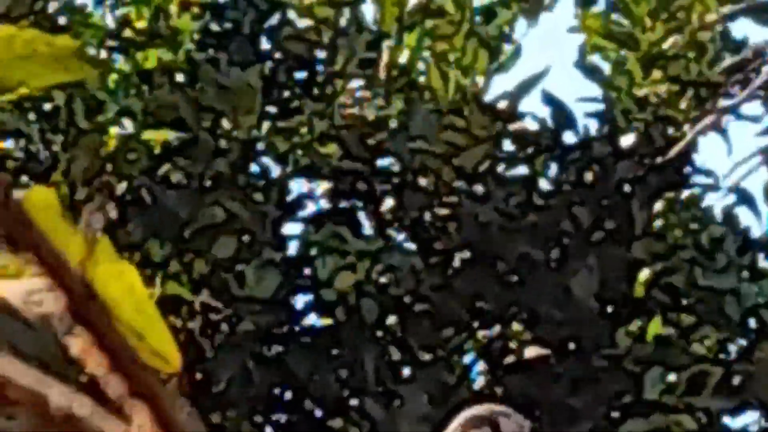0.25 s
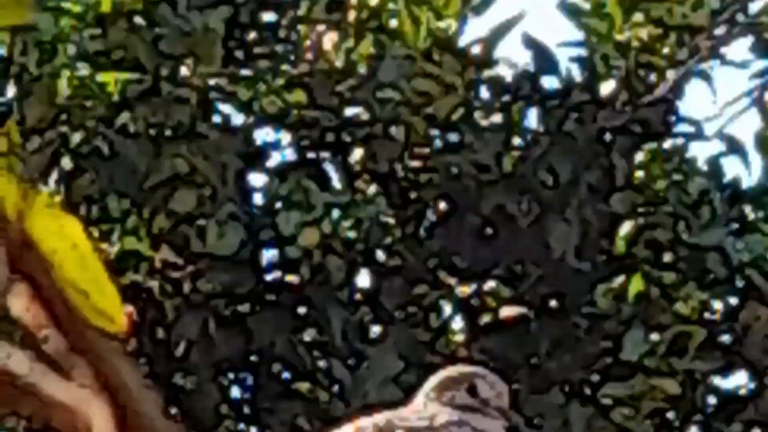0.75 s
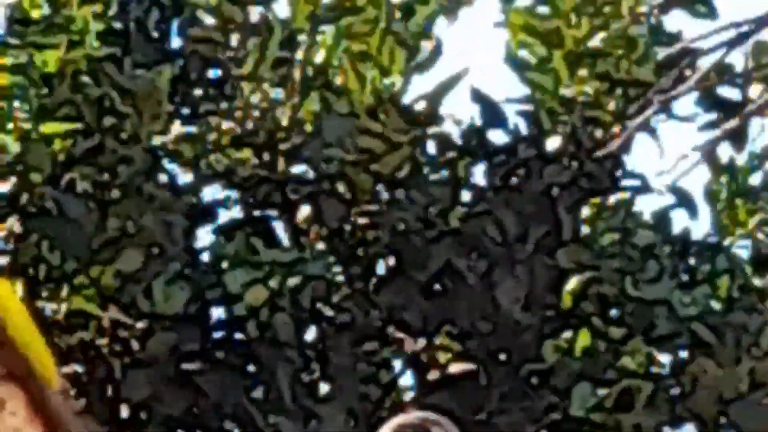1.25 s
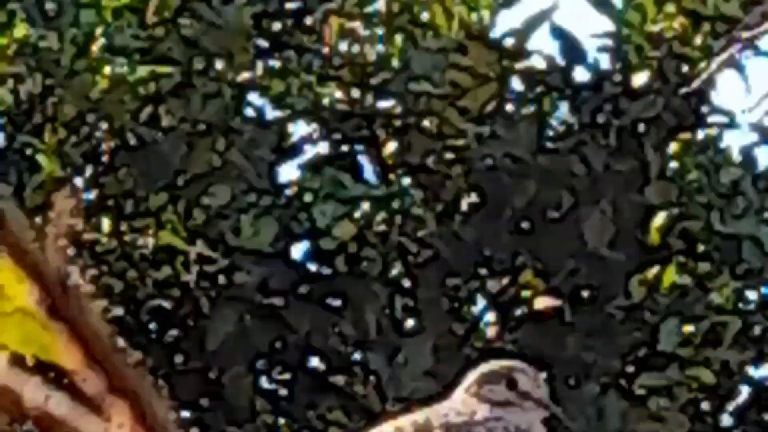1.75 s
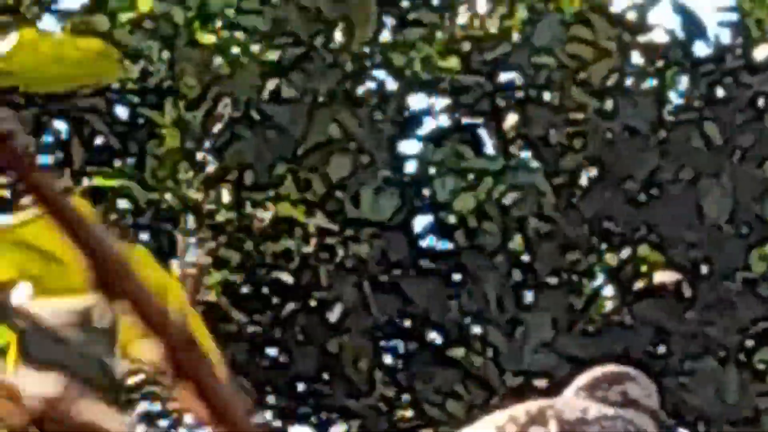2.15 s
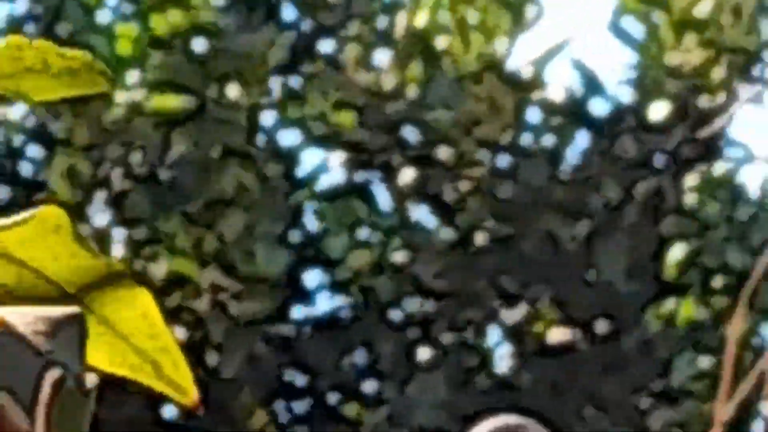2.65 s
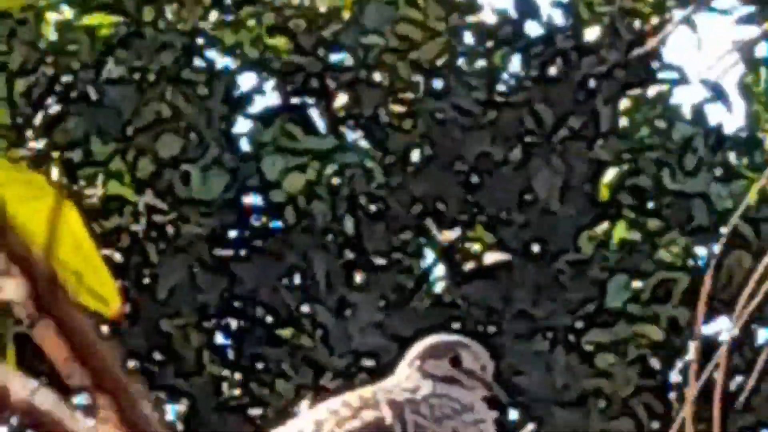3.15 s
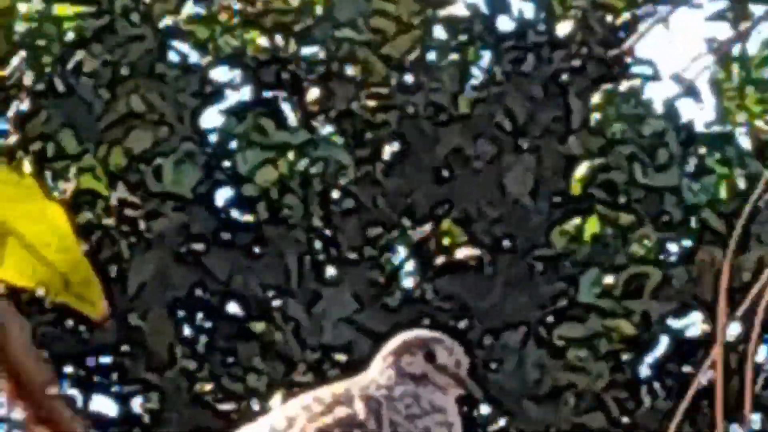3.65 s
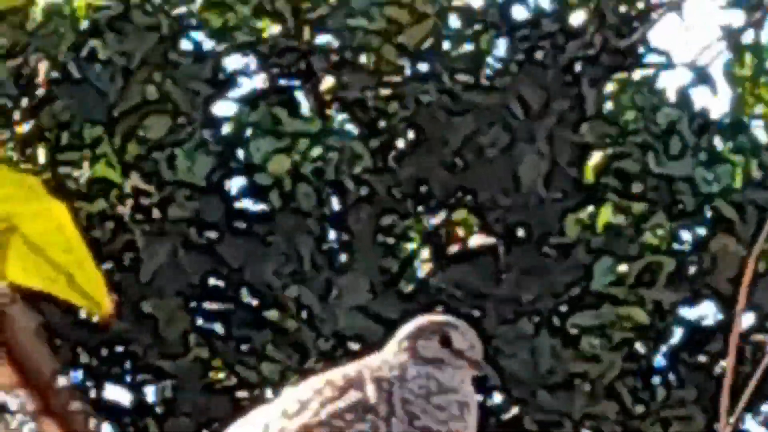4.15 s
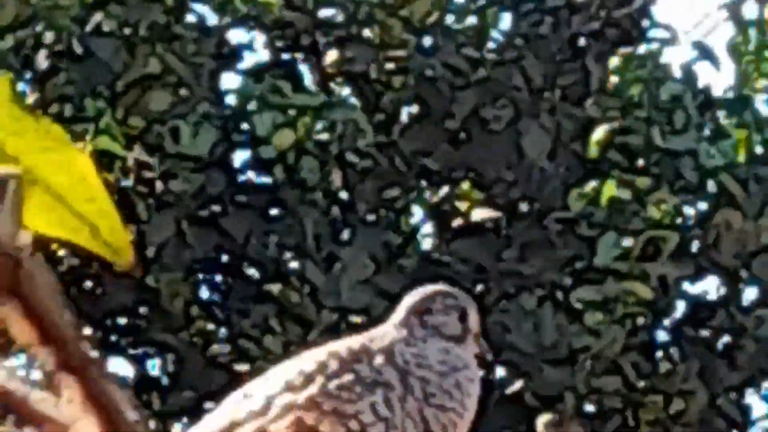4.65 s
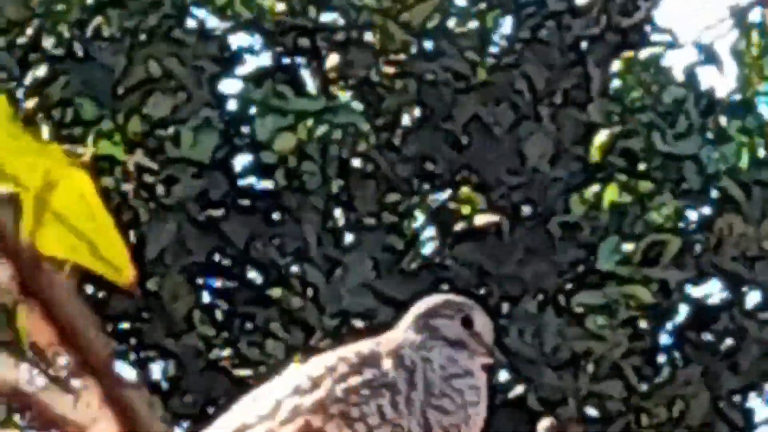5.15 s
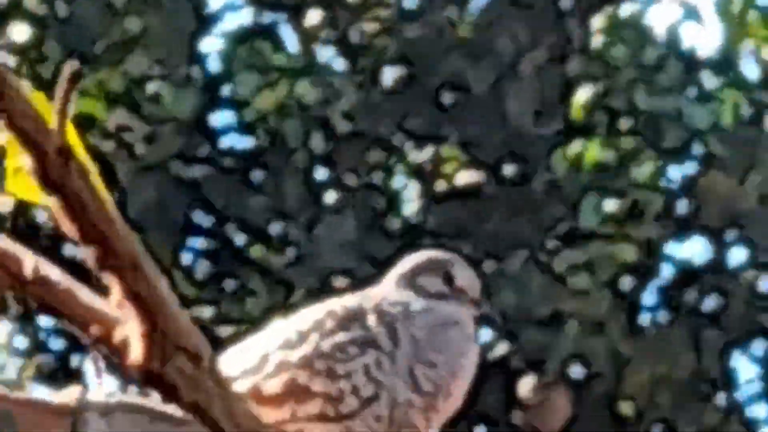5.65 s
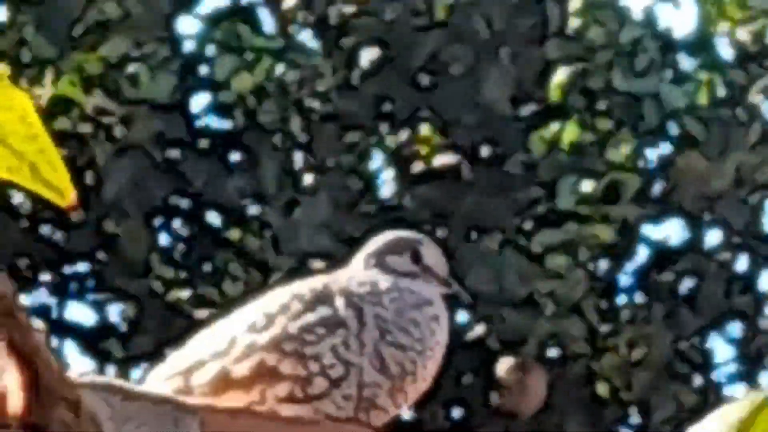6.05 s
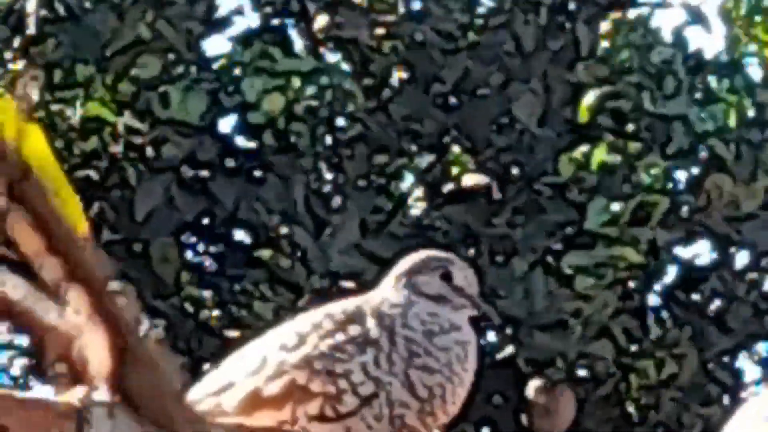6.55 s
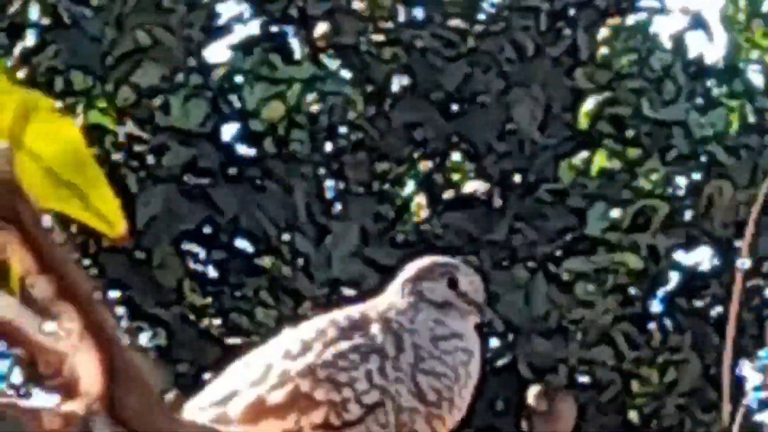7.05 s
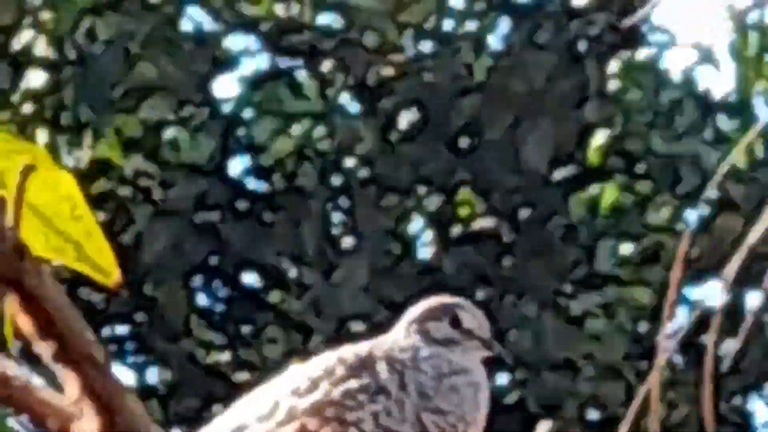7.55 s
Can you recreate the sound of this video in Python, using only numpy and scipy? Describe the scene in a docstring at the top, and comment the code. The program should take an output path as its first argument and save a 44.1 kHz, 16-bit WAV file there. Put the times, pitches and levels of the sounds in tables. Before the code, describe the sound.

A small dove repeats a quick three-note coo outdoors, over a distant engine's rising and falling rumble and faint leaf hiss.

```python
"""A small dove on a branch repeats "coo, cut-coo": three near-pure whistles that arch and fall in pitch.
Echoes from nearby surfaces beat against the glides and trail off in the trees.
Further off, a heavy six-cylinder engine revs up and down over road rumble, with a few brief hums.
Leaves hiss and tick."""
import sys
import numpy as np
from scipy import signal
from scipy.fft import rfft, irfft
from scipy.io import wavfile
from scipy.ndimage import uniform_filter1d

SR = 44100
rng = np.random.default_rng(int(sys.argv[2]) if len(sys.argv) > 2 else 0)


def store_wav(level_fs):
    """Save 16-bit WAV to argv[1]."""
    pcm = np.round(np.clip(np.atleast_2d(level_fs), -1, 1) * 32767)
    wavfile.write(sys.argv[1], SR, pcm.T.astype(np.int16))


N = 343539
TIME_S = np.arange(N) / SR
FREQ_HZ = np.fft.rfftfreq(N, 1 / SR) + 1e-6

# dove notes: t/s, length factor, pitch factor, level/dB, added rise/Hz
FIRST_COO_NOTES = [(1.334, 1.03, 1.002, -32.9, 10), (3.807, 0.94, 1.001, -32.4, -13),
                   (5.472, 1.01, 1.005, -32.1, 1), (7.159, 1.04, 1.004, -31.8, -2)]
CUT_NOTES = [(-0.015, 0.97, 0.998, -29.4, -1), (1.716, 1.0, 1.001, -31.4, 0),
             (4.187, 0.97, 1.003, -29.4, 0), (5.851, 0.98, 1.014, -31.3, -12),
             (7.539, 1.0, 1.01, -29.5, -8)]
LAST_COO_NOTES = [(0.1, 0.95, 1.001, -31.5, 12), (1.828, 0.95, 1.004, -32.5, 6),
                  (4.3, 0.96, 1.013, -30.4, -13), (5.963, 1.01, 1.015, -30.8, -9),
                  (7.65, 1.01, 1.006, -30.4, 5)]
# note contours: t/s from onset, f/Hz, relative level/dB
FIRST_COO_CONTOUR = [(0.0, 561.3, -16), (0.012, 780.5, -5), (0.035, 903.4, -1.4), (0.055, 891.6, -2),
                     (0.085, 859, -5.5), (0.121, 785.5, 1.4), (0.16, 727, -4.5), (0.195, 685.2, -10.5),
                     (0.217, 616, -7)]
CUT_CONTOUR = [(0.0, 613, -9.1), (0.01, 902, -2.3), (0.022, 968, -3.5), (0.04, 916, 0.6),
               (0.054, 770, -7.3), (0.068, 557, -16.4)]
LAST_COO_CONTOUR = [(0.0, 657, -3.5), (0.013, 895, -3), (0.035, 929, 1.5), (0.07, 912, 2), (0.12, 877, -3),
                    (0.162, 815, -2), (0.194, 786, -3), (0.22, 729, -11.5), (0.237, 644, -11)]
# ground, trunk and wall echoes: delay/ms, level/dB, right-ear lag/ms
REFLECTIONS = [(4.41, -9.9, -0.39), (9.97, -10.4, -0.13), (12.69, -8.7, -0.07), (16.28, -13.7, 0.01),
               (16.94, -11.6, -0.65), (17.97, -11.4, 0.03), (21.33, -16.0, 0.04), (25.24, -15.0, -0.02),
               (29.04, -15.0, -0.03), (34.74, -11.7, -0.05), (39.62, -12.5, -0.15), (45.35, -19.1, -0.19),
               (45.75, -16.1, -0.03), (54.01, -19.2, -0.23), (58.85, -15.6, -0.19), (59.28, -17.9, -0.13),
               (67.53, -10.7, -0.05), (68.06, -9.7, -0.05)]

# engine firing rate: t/s, f/Hz
FIRING_RATE = [(0, 83.2), (.37, 71.2), (.7, 77), (1.06, 70.9), (1.6, 67.23), (2.2, 54.4), (2.58, 54.4),
               (2.88, 81.87), (3.19, 89.2), (3.47, 92.5), (3.8, 90.76), (4.06, 84.2), (4.45, 90.37),
               (4.81, 88.4), (5.23, 82.56), (6.12, 65.83), (6.31, 81.66), (6.51, 91.7), (6.75, 82.93),
               (6.98, 80.36), (7.24, 93.1), (7.46, 98.2), (7.79, 96.2)]
# firing tone and second harmonic, before expansion: t/s, level/dB
FIRING_LEVEL = [(0.0, -32.5), (0.15, -31.5), (0.22, -49.5), (0.8, -46.5), (1.36, -62), (1.74, -43),
                (2.08, -50), (2.41, -41.5), (2.62, -47), (2.69, -32.5), (3.1, -36), (3.23, -29),
                (3.75, -34.5), (3.8, -31.5), (3.86, -48.5), (4.23, -32.5), (4.25, -37.5), (4.47, -27.5),
                (4.81, -29.5), (4.88, -40.5), (4.92, -36), (4.99, -41), (5.53, -40.5), (5.55, -46),
                (5.71, -34.5), (5.81, -57), (5.9, -35.5), (6.14, -33), (6.2, -47.5), (6.55, -29),
                (6.62, -32), (6.7, -50), (6.77, -36.5), (6.81, -56), (6.94, -38), (6.99, -53), (7.2, -41),
                (7.24, -31.5), (7.31, -28.5), (7.79, -25.5)]
SECOND_LEVEL = [(0.0, -56), (0.28, -50), (0.3, -78), (2.62, -55.5), (2.8, -46.5), (3.12, -33.5),
                (3.27, -46), (3.3, -43.5), (3.95, -52.5), (4.32, -41), (4.99, -37), (5.12, -54),
                (5.19, -41.5), (5.84, -51), (5.97, -40.5), (6.31, -47.5), (6.49, -37), (6.96, -52.5),
                (7.46, -39.5), (7.79, -37.5)]
# low lines from unequal cylinders, then overtones: multiple of cycle rate, relative level/dB
LOPE_LINES = [(2, -33), (4, -21), (5, -15), (7, -18.5), (8, -37), (9, -27.5)]
OVERTONE_LINES = [(14, -3), (15, -11), (16, -14.5), (18, -8.5), (21, -14), (24, -10), (28, -14),
                  (30, -20.5), (36, -19.5), (42, -14)]
# exhaust resonances: f/Hz, gain/dB
EXHAUST_RESPONSE = [(150, -13), (210, -8), (238, 6.5), (275, -4.5), (296, 4.5), (312, 8.5), (332, -9.5),
                    (400, -21), (428, 9), (455, -4), (700, -22)]
# hums in the engine noise: t/s, length/s, f/Hz, level/dB
HUM_EVENTS = [(2.077, 0.64, 96.6, -44.5), (2.603, 0.27, 315.4, -52.5), (5.377, 0.285, 235.8, -48),
              (6.78, .25, 313, -44.5)]

# road roar, low and high leaf hiss; only the swing about the mean counts: t/s, level/dB
ROAD_LEVEL = [(0.0, -52.5), (0.45, -62), (0.76, -57.5), (1.3, -65), (1.43, -60), (2.56, -64), (2.6, -66.5),
              (2.75, -51.5), (3.01, -56), (3.43, -57), (5.88, -57.5), (6.68, -56), (6.72, -57.5),
              (7.57, -52.5), (7.72, -54.5), (7.79, -51)]
LEAF_LOW_LEVEL = [(0.0, -60), (0.39, -63), (1.28, -64), (1.84, -60.5), (2.4, -63), (3.32, -59), (3.92, -61),
                  (4.37, -58.5), (4.8, -59.5), (4.97, -61), (6.86, -62), (7.7, -59.5)]
LEAF_HIGH_LEVEL = [(0.0, -70.5), (0.15, -64), (0.37, -69.5), (1.28, -69.5), (1.8, -65), (2.19, -68),
                   (2.84, -63.5), (3.14, -63), (3.3, -62), (3.6, -61.5), (3.93, -64), (4.56, -61),
                   (5.16, -65), (5.62, -64), (6.72, -66.5), (7.79, -66)]
# noise spectra: f/Hz, relative density/dB
ROAD_SPECTRUM = [(20, -49), (40, 2), (60, 6), (100, 10.5), (160, 4), (250, -4.5), (320, 0), (420, -6.5),
                 (600, -5.5), (800, -9.5), (1100, -18.5), (1600, -26)]
AIR_SPECTRUM = [(700, -6.5), (1200, 6.5), (1600, -2.5), (2100, -1), (2800, -15), (4000, -18.5)]
LEAF_LOW_SPECTRUM = [(1800, -2.5), (2600, 0.5), (3600, 1.5), (4150, 3), (4600, 1.5), (6000, -2), (7300, -2),
                     (7900, -11.5), (9000, -23)]
LEAF_HIGH_SPECTRUM = [(7000, -15), (8200, -14), (9300, -6.5), (11000, -3.5), (12400, -2), (14000, -2.5),
                      (15800, -6.5)]
# noise balance: f/Hz, left minus right/dB
NOISE_BALANCE = [(60, -5.5), (160, -0.5), (300, -2), (1000, 0), (2300, -2.5), (4400, -2.5), (6500, -9.5),
                 (9000, 2.5), (13000, 1)]
# leaves and twigs brushing: t/s, level/dB, length/s, centre/Hz, width/Hz
RUSTLE_EVENTS = [(.29, -65, .04, 8700, 700), (.962, -65, .025, 11000, 6000), (1.456, -63, .012, 9000, 7000),
                 (1.597, -55.5, .012, 10000, 10000), (1.652, -56, .01, 9000, 10000),
                 (2.655, -59, .015, 13000, 4000), (5.685, -59, .02, 13000, 3000),
                 (6.932, -53, .025, 4800, 4000), (7.29, -56, .01, 5500, 2000),
                 (7.726, -51, .03, 3800, 5000), (7.76, -53, .04, 3800, 5000)]


def undb(db):
    """dB to gain."""
    return 10 ** (np.asarray(db) / 20)


def unit(x):
    """Scale to rms 1."""
    return x / np.sqrt(np.mean(x ** 2))


def pan(db):
    """Stereo gains, left db above right."""
    return undb(np.array([[db], [-db]]) / 2)


def curve(table):
    """Time table, interpolated per sample."""
    return np.interp(TIME_S, *np.transpose(table))


def swing_db(table):
    """Level curve minus its mean."""
    db = curve(table)
    return db - db.mean()


def spectrum_gain(spectrum):
    """Gain per FFT bin, interpolated over log frequency."""
    hz, db = np.transpose(spectrum)
    return undb(np.interp(np.log(FREQ_HZ), np.log(hz), db))


def drift(rate_hz):
    """Smooth random drift, spread near 1."""
    hold = int(SR / rate_hz)
    steps = rng.standard_normal(N // 40)[np.arange(N) // max(hold, 40)]
    return 1.3 * uniform_filter1d(uniform_filter1d(steps, hold), hold)


def noise(spectrum, coherent_hz=900):
    """Coloured stereo noise, rms 1; ears alike in the bass, unrelated in the treble."""
    mid, side = rfft(rng.standard_normal((2, N)))
    coherence = .75 / (1 + (FREQ_HZ / coherent_hz) ** 4)
    ears = mid * np.sqrt(1 + coherence) + np.array([[1], [-1]]) * side * np.sqrt(1 - coherence)
    rolloff = 1 / (1 + (FREQ_HZ / (2 * spectrum[-1][0])) ** 4)
    balance = spectrum_gain(NOISE_BALANCE) ** np.array([[.5], [-.5]])
    return unit(irfft(ears * spectrum_gain(spectrum) * rolloff * balance, N))


def coos(notes, contour, edge_s=0.0032, waver=0.007):
    """One note type: a sine on an arched contour, stretched and retuned per note."""
    knots_s, hz, db = np.transpose(contour)
    end_s = knots_s[-1]
    tremor = 1 + waver * drift(120)
    out = np.zeros(N)
    for start_s, stretch, pitch, note_db, rise_hz in notes:
        contour_s = (TIME_S - start_s) / stretch
        on = (contour_s > 0) & (contour_s < end_s)
        contour_s = contour_s[on]
        note_hz = np.interp(contour_s, knots_s, hz) * pitch + rise_hz * contour_s / end_s
        phase = 2 * np.pi * np.cumsum(note_hz * tremor[on]) / SR
        gate = np.minimum(np.minimum(contour_s, end_s - contour_s) / edge_s, 1)
        out[on] += gate * undb(note_db + np.interp(contour_s, knots_s, db)) * np.sin(phase)
    return out


def dove():
    """Closed beak and swollen throat pass only the fundamental."""
    return (coos(FIRST_COO_NOTES, FIRST_COO_CONTOUR) + coos(CUT_NOTES, CUT_CONTOUR)
            + coos(LAST_COO_NOTES, LAST_COO_CONTOUR))


def echoes(source, tail_db=-12.0, t60_s=0.5, build_s=0.13):
    """Direct sound, discrete reflections and a diffuse tail building among the trees."""
    t = TIME_S[:SR]
    tail = rng.standard_normal((2, SR)) * undb(-60 * t / t60_s) * np.minimum(t / build_s, 1) ** 3
    response = undb(tail_db) * unit(tail) / np.sqrt(SR)
    response[:, 0] += 1
    for delay_ms, db, lag_ms in REFLECTIONS:
        for ear, side in enumerate((-.5, .5)):
            response[ear, round((delay_ms + side * lag_ms) * 1e-3 * SR)] += undb(db)
    return signal.fftconvolve(source[None], response, axes=1)[:, :N]


def partial(crank_locked_phase, db, flutter_db=4.5, scatter=0.24):
    """One fluttering engine line; shifting paths through the trees pull the ears apart."""
    phase = crank_locked_phase + rng.uniform(0, 2 * np.pi)
    side = scatter * drift(11) * np.cos(phase)
    amplitude = np.sqrt(2) * undb(db + flutter_db * drift(18))
    return amplitude * (np.sin(phase) + np.array([side, -side]))


def engine(cylinders=6, wander=0.0032, expand=0.16, overtone_base_db=-55, overtone_follow=0.28):
    """Distant exhaust: strong firing tone, weaker lines at multiples of the cycle rate."""
    firing_hz = curve(FIRING_RATE)
    phase = 2 * np.pi * np.cumsum(firing_hz * (1 + wander * drift(25.08))) / SR
    # expansion sinks the tones into the rumble as the engine eases off
    firing_db = curve(FIRING_LEVEL) + expand * swing_db(FIRING_LEVEL)
    second_db = curve(SECOND_LEVEL) + expand * swing_db(SECOND_LEVEL) - 2
    overtone_db = overtone_base_db + overtone_follow * (swing_db(ROAD_LEVEL) + swing_db(SECOND_LEVEL))
    out = partial(0.99 * phase, firing_db, flutter_db=0.6)
    out += partial(2 * phase, second_db, flutter_db=1.5) * pan(db=2.5)
    for order, db in LOPE_LINES:
        out += partial(order / cylinders * phase, firing_db + db)
    for order, db in OVERTONE_LINES:
        ratio = order / cylinders
        resonance_db = np.interp(ratio * firing_hz, *np.transpose(EXHAUST_RESPONSE))
        out += partial(ratio * phase, overtone_db + db + resonance_db)
    return out * pan(db=-1.15)


def road(base_db=-46.5, rumble_hz=170, rumble_follow=0.34, swell_db=1.5):
    """Road roar; its low rumble swells with the engine's firing tone."""
    roar = noise(ROAD_SPECTRUM) * undb(swing_db(ROAD_LEVEL) + swell_db * drift(14))
    rumble = irfft(rfft(roar) / (1 + (FREQ_HZ / rumble_hz) ** 6), N)
    upper = roar - rumble
    return undb(base_db) * (upper + rumble * undb(rumble_follow * swing_db(FIRING_LEVEL)))


def air(base_db=-61.5, road_follow=0.75):
    """Mid-range rush that follows the road's level."""
    return noise(AIR_SPECTRUM) * undb(base_db + road_follow * swing_db(ROAD_LEVEL))


def foliage(low_db=-59, high_db=-60, flicker_db=1.62, grain_db=1.5):
    """Leaf hiss in two bands; the high band flickers more."""
    jitter_db = flicker_db * drift(35) + grain_db * drift(900)
    low = noise(LEAF_LOW_SPECTRUM) * undb(low_db + swing_db(LEAF_LOW_LEVEL) + jitter_db / 2)
    high = noise(LEAF_HIGH_SPECTRUM) * undb(high_db + swing_db(LEAF_HIGH_LEVEL) + jitter_db)
    return low + high


def rustles(grain_db=3):
    """Leaves and twigs brush: short, grainy puffs of band noise."""
    out = np.zeros((2, N))
    for start_s, db, length_s, centre_hz, width_hz in RUSTLE_EVENTS:
        progress = (TIME_S - start_s) / length_s
        on = (progress > 0) & (progress < 2)
        grains = rng.standard_normal((2, on.sum())) * undb(grain_db * rng.standard_normal(on.sum()))
        band_hz = [centre_hz - width_hz / 2, centre_hz + width_hz / 2]
        puff = signal.sosfilt(signal.butter(2, band_hz, "band", fs=SR, output="sos"), grains)
        rise = 4 * progress[on]  # peak at a quarter of length_s
        out[:, on] += undb(db) * unit(puff) * rise * np.exp(1 - rise)
    return out


def hums(waver=0.0128):
    """Weak, wavering tones swell and fade, ringing out with the engine."""
    pitch = 1 + waver * drift(13)
    out = np.zeros(N)
    for start_s, length_s, hz, db in HUM_EVENTS:
        swell = np.sin(np.pi * np.clip((TIME_S - start_s) / length_s, 0, 1))
        phase = 2 * np.pi * np.cumsum(hz * pitch) / SR
        out += np.sqrt(2) * undb(db) * swell * np.sin(phase)
    return out


def scene(lag_samples=7):
    """Stereo mix; sound reaches the right side slightly later."""
    left, right = echoes(dove()) + engine() + road() + air() + foliage() + rustles() + hums()
    return np.array([left, np.pad(right, (lag_samples, 0))[:N]])


def record(dry):
    """Steep elliptic low-pass."""
    cutoff_hz = 15600
    return signal.sosfilt(signal.ellip(10, .2, 80, cutoff_hz, fs=SR, output="sos"), dry)


dry = scene()
out = record(dry)
store_wav(out)
```